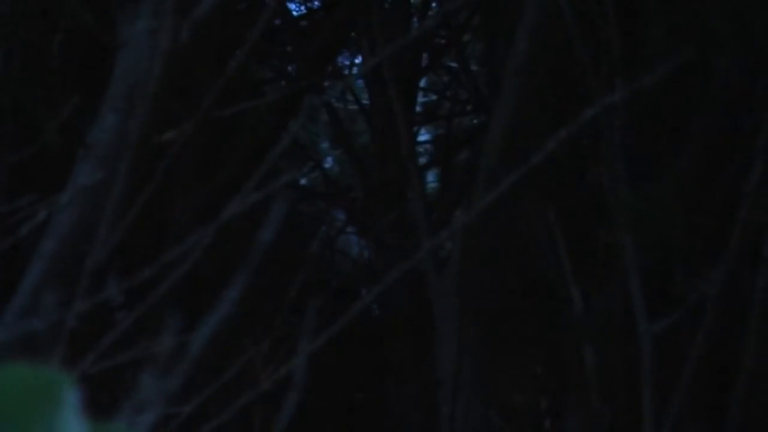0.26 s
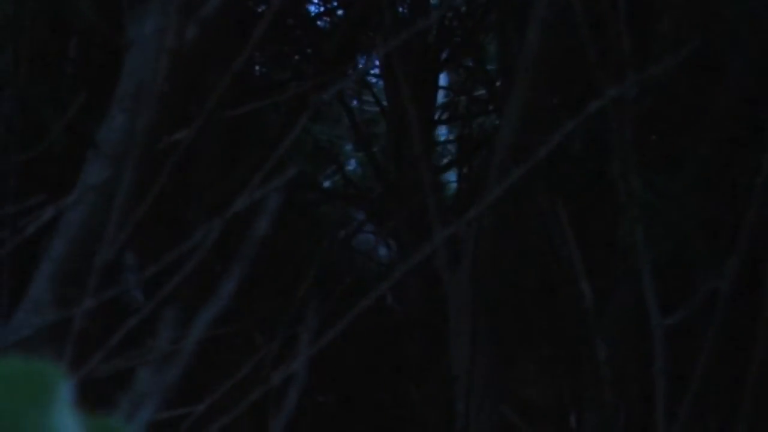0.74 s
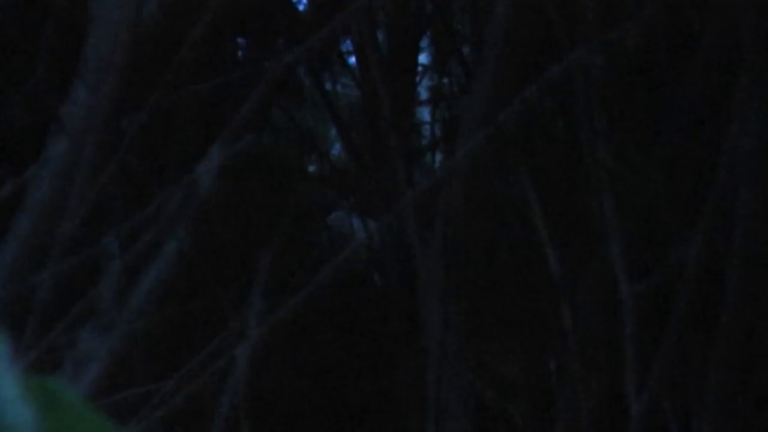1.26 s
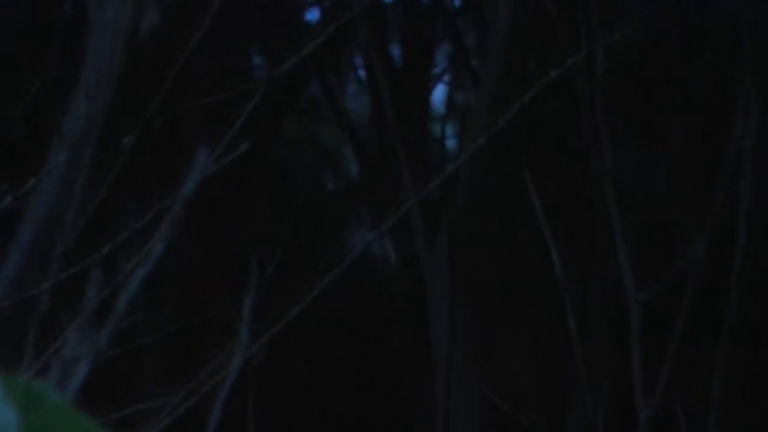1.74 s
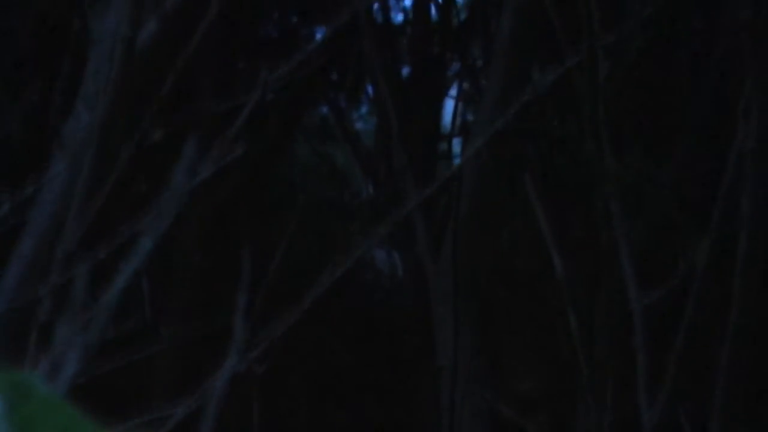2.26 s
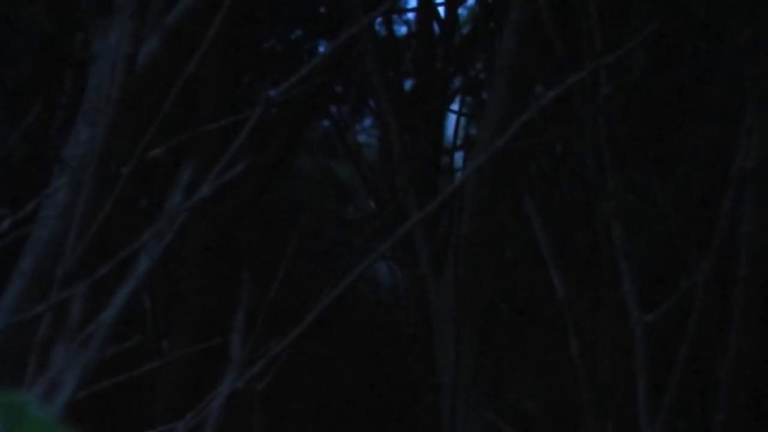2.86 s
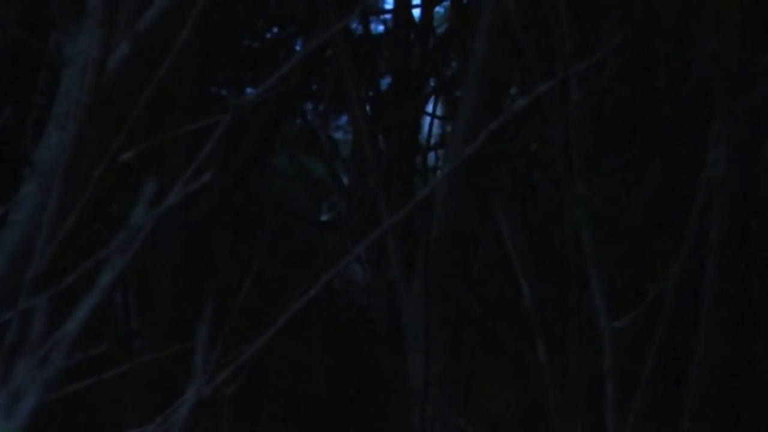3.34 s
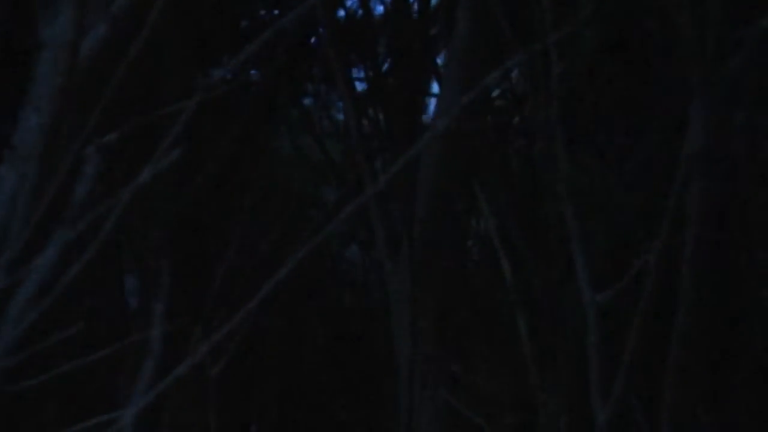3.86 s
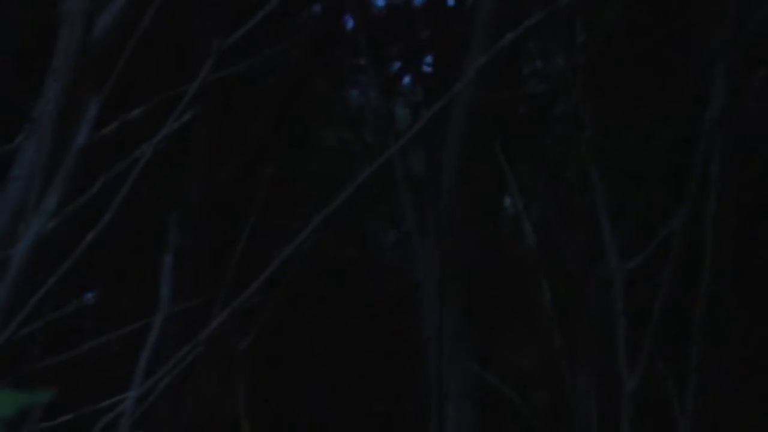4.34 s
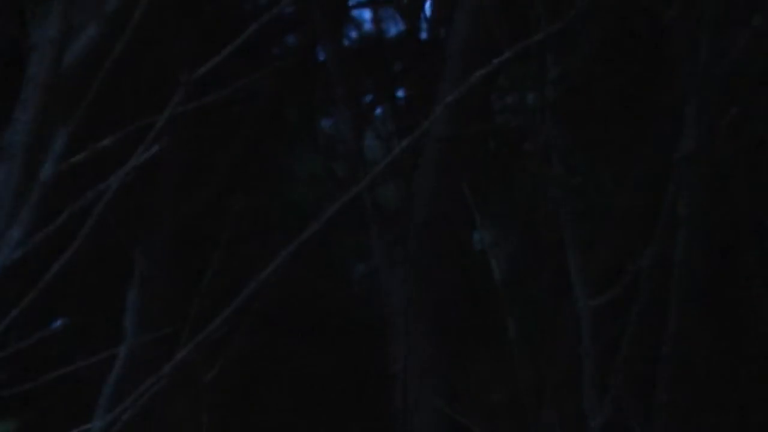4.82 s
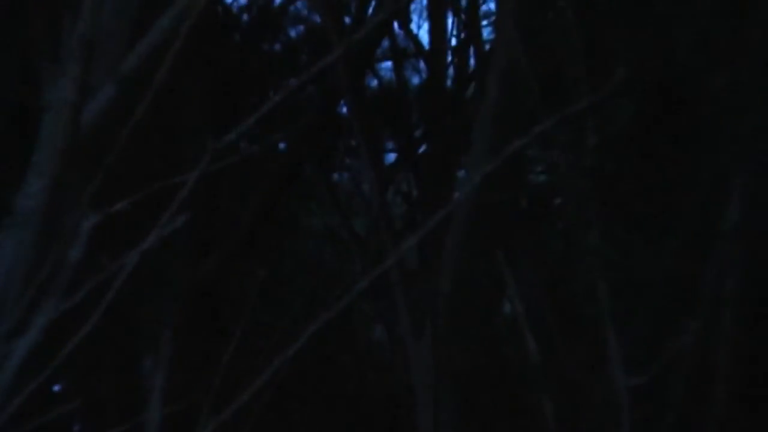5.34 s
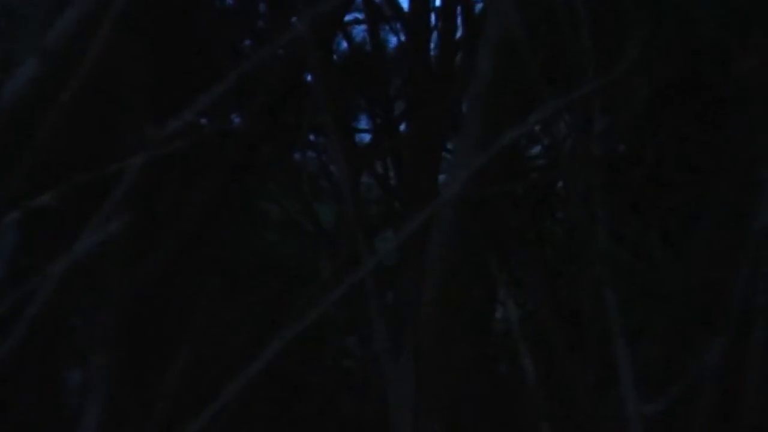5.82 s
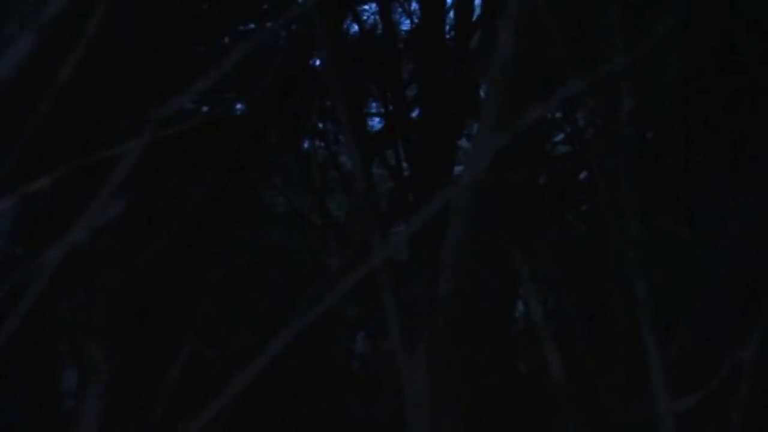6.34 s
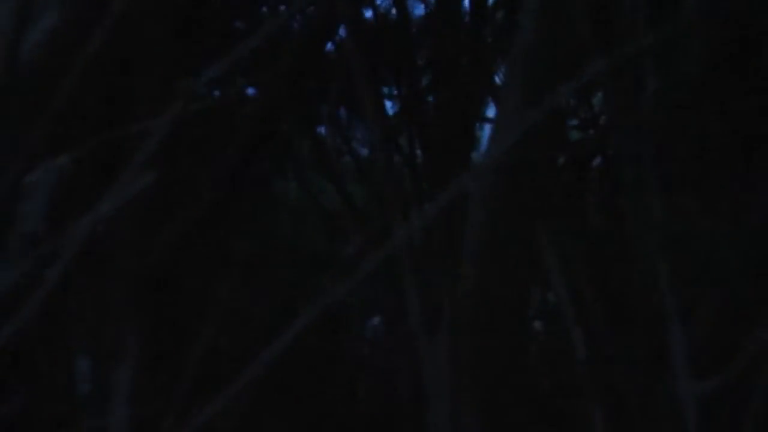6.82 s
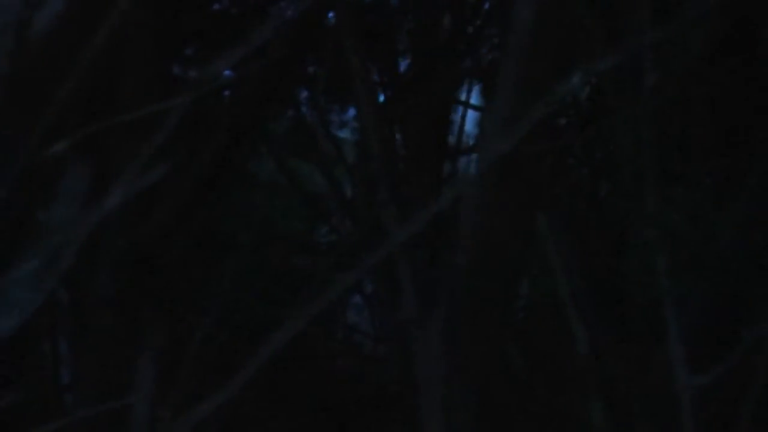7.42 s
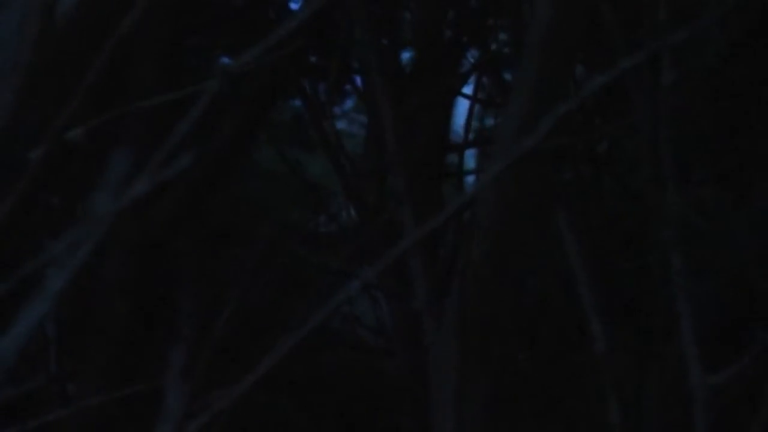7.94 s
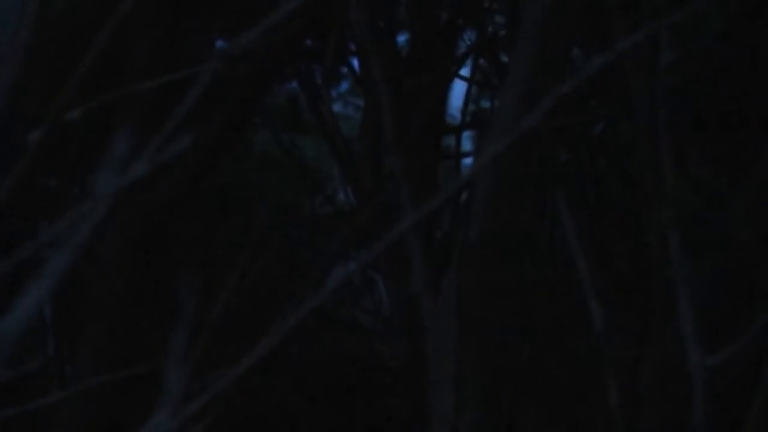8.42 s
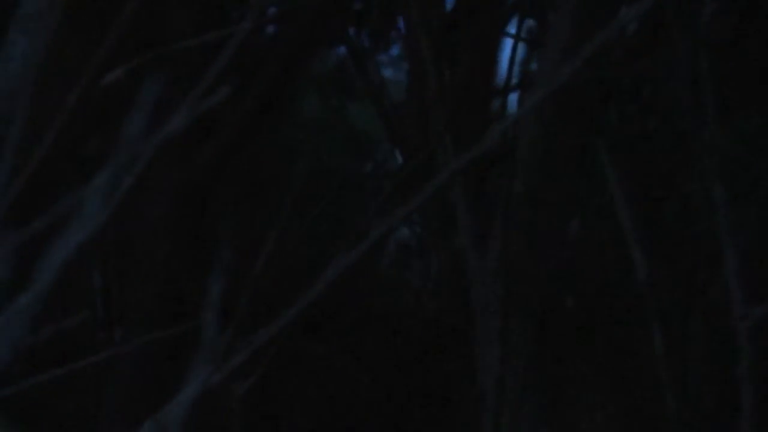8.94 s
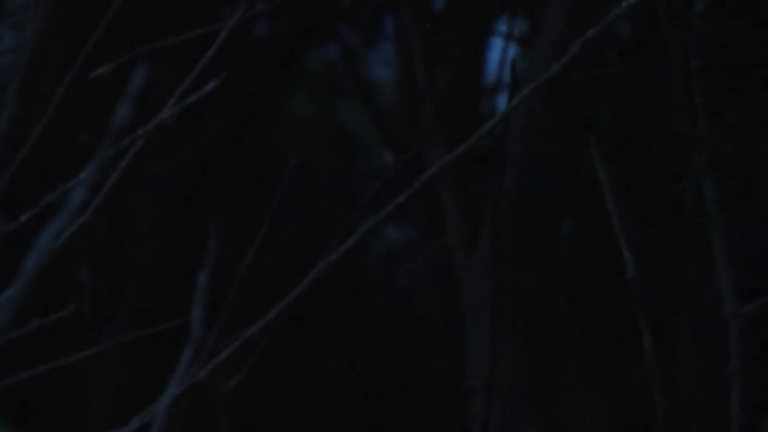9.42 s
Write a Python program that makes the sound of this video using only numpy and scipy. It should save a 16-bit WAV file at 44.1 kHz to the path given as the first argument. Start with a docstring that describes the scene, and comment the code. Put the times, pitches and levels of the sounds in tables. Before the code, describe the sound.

In a quiet wood, far traffic hums under a few faint bird whistles. A hand taps the microphone twice, then a young owl nearby lets out a brief, high squeal with a raspy end. Leaves stir faintly, a twig cracks close by, and the owl screams again, a little louder, leaving a slight echo among the trees. A distant small bird then repeats a thin, scratchy chirp.

```python
"""A young owl screams twice from a tree close to the microphone, in a wood at dusk.
Each scream starts as a clear squeal, then sinks and turns raspy as the syrinx doubles its period.
Nearby a twig snaps, leaves rustle and a hand knocks on the camera that holds the stereo microphone.
Small birds call from deeper in the wood, traffic hums far off, and the trees return a faint tail."""
import sys
import numpy as np
from scipy import signal
from scipy.fft import rfft, irfft
from scipy.io import wavfile
from scipy.ndimage import uniform_filter1d

SR = 44100
rng = np.random.default_rng(int(sys.argv[2]) if len(sys.argv) > 2 else 0)


def int16_out(signal):
    """Quantize to a 16-bit WAV file."""
    q = np.round(np.clip(np.atleast_2d(signal).T, -1, 1) * 32767)
    wavfile.write(sys.argv[1], SR, q.astype(np.int16))


N = 426447
TIME = np.arange(N) / SR


def gain_of(db):
    """Decibels to amplitude."""
    return 10 ** (np.asarray(db) / 20)


def unit_rms(x):
    """Scales to rms 1."""
    return x / np.sqrt(np.mean(x ** 2) + 1e-20)


def curve_at(points, hz):
    """Reads a table on a log-frequency axis."""
    f, value = np.transpose(points)
    return np.interp(np.log(hz + 1), np.log(f + 1), value)


def add(mix, start, sound):
    """Mixes a sound in, start seconds from the beginning."""
    part = mix[round(start * SR):][:len(sound)]
    part += sound[:len(part)]


def filtered(x, gain):
    """Applies a gain given as a function of frequency."""
    return irfft(rfft(x) * gain(np.fft.rfftfreq(len(x), 1 / SR)), len(x))


def wander(size, hz):
    """Random motion of rms 1, mostly slower than hz."""
    return unit_rms(filtered(rng.standard_normal(size), lambda f: 1 / np.sqrt(1 + (f / hz) ** 4)))


def bump(t, centre, width):
    """A smooth rise to 1 and back."""
    return np.exp(-((t - centre) / width) ** 2)


def resonance(f, centre_hz, q):
    """Gain of one broad resonance."""
    return 1 / np.sqrt(1 + (q * (f / centre_hz - centre_hz / (f + 1))) ** 2)


def noise_tone(hz, width_hz):
    """A narrow band of noise, heard as a soft tone."""
    return unit_rms(filtered(rng.standard_normal(N), lambda f: 1 / (1 + (2 * (f - hz) / width_hz) ** 2)))


# Swells on the far road: t/s, half length/s, rise/dB
ROAD_SWELLS = [(.62, 0.12, 4), (2.1, 0.24, 1.5), (3.85, .2, 1.5), (4.76, .11, 2.5), (5.898, .4, 1.75),
               (8.05, 0.25, 1.5), (9.6, .25, 1.5)]

def road_db(start_db=-59, steady_db=-54, build_s=4.6):
    """Level of the far road: it builds up, then stays, swelling now and then."""
    level = start_db + (steady_db - start_db) * np.minimum(TIME / build_s, 1)
    return level + sum(db * bump(TIME, at, half) for at, half, db in ROAD_SWELLS)


# Far traffic and still air: f/Hz, relative level/dB
AMBIENCE_SPECTRUM = [(22, -62), (48, -27), (85, -13), (140, -21.5), (210, -2), (400, 5), (720, 2.5),
                     (1100, 4.5), (1650, 0.5), (2300, -8), (4000, -20), (4600, -23.5), (5300, -23),
                     (7700, -23), (8500, -26.5), (10000, -29.5), (10900, -24.5), (11800, -31), (15500, -34)]
# Their stereo image at the microphone: f/Hz, left-right correlation
AMBIENCE_CORRELATION = [(40, .88), (90, .84), (170, .78), (330, .7), (700, .72), (1300, .8), (4000, .75),
                        (12000, .7)]

def traffic_and_air(rumble_db=-63, hiss_db=-66.5, rumble_hz=230, hiss_hz=2800, patchy_db=2.1):
    """Far traffic swells and drifts between a steady low rumble and an even hiss."""
    frames, hz = N // 256 + 5, np.fft.rfftfreq(1024, 1 / SR)
    left_re, left_im, other_re, other_im, patches = rng.standard_normal((frames, len(hz), 5)).T
    patches = uniform_filter1d(patches, size=5, axis=0)  # smooth across frequency
    patches = unit_rms(uniform_filter1d(patches, size=30, axis=1))  # and across time
    likeness = curve_at(AMBIENCE_CORRELATION, hz)[:, None]
    left = left_re + 1j * left_im
    right = likeness * left + np.sqrt(1 - likeness ** 2) * (other_re + 1j * other_im)
    spectra = np.array([left, right]) * gain_of(curve_at(AMBIENCE_SPECTRUM, hz))[:, None]
    bass, below_hiss = (1 / (1 + (hz[:, None] / edge) ** 4) for edge in (rumble_hz, hiss_hz))
    middle = (below_hiss - bass) * gain_of(patchy_db * patches)
    rumble, road, hiss = (unit_rms(signal.istft(spectra * band, nperseg=1024, noverlap=768)[1][:, :N])
                          for band in (bass, middle, 1 - below_hiss))
    bed = gain_of(rumble_db) * rumble + gain_of(road_db()) * road + gain_of(hiss_db) * hiss
    return bed * gain_of([[-.3], [.3]])  # leans a little to the right


def tyres(hz=1105, width_hz=80, relative_db=-12):
    """Tyres sing on the far road, following the level of the traffic."""
    return gain_of(road_db() + relative_db) * noise_tone(hz, width_hz)


def far_hum(length_s=.47, hz=405, db=-59):
    """A soft, nearly steady tone from far away."""
    size = int(length_s * SR)
    phase = 2 * np.pi * np.cumsum(hz * (1 + .0047 * wander(size, 11.6))) / SR
    return gain_of(db) * unit_rms(np.sin(phase) * signal.windows.tukey(size, .5))


# Thin whines and a hiss band, right at the microphone: f/Hz, width/Hz, level/dB
CAMERA_WHINES = [(2600, 10, -81), (3040, 10, -82), (3580, 10, -79.5), (4560, 320, -77.5),
                 (10600, 60, -83.5)]

def camera_whine():
    """The camera's own faint tones, which never stop."""
    return sum(gain_of(db) * noise_tone(hz, width) for hz, width, db in CAMERA_WHINES)


# Decay of the wood around the microphone: f/Hz, t60/s
WOOD_DECAY = [(500, 0.43), (2300, 1.1), (4500, 0.99), (7000, .8), (9000, 0.62), (14000, .35)]

def tree_echoes(x, branch_db=6, branch_t60=.09, likeness=.89, echoes_per_s=3000):
    """Sparse echoes: a quick cluster from close branches, then a long tail from the trunks."""
    left, other = rng.standard_normal((2, SR)) * (rng.random((2, SR)) < echoes_per_s / SR)
    right = likeness * left + np.sqrt(1 - likeness ** 2) * other
    hz, t, spectra = signal.stft([left, right], SR, nperseg=256)
    trunks = gain_of(-60 * t / curve_at(WOOD_DECAY, hz)[:, None])
    branches = gain_of(branch_db - 60 * t / branch_t60)
    tail = signal.istft(spectra * (trunks + branches), SR, nperseg=256)[1]
    return signal.fftconvolve(x[None], tail / np.linalg.norm(tail[0]), axes=1)[:, :N]


def bird_note(db, length_s, hz, bend, scratch, overtone=0):
    """A thin glide that bends by a share of its pitch and levels off, scratchy if the pitch trembles."""
    size = int(length_s * SR)
    glide_hz = hz * (1 + bend * np.sin(np.linspace(0, np.pi / 2, size)))
    phase = 2 * np.pi * np.cumsum(glide_hz * (1 + scratch * wander(size, 410))) / SR
    tone = np.sin(phase) + overtone * np.sin(2 * phase)
    return gain_of(db) * unit_rms(tone * signal.windows.tukey(size, .7))


# One distant bird repeats a scratchy rising chirp: t/s, relative level/dB
BIRD_CHIRPS = [(0.574, -67.5), (7.826, -60), (7.919, -71), (8.23, -70), (8.6, -68.5), (8.975, -68),
               (9.36, -68)]
# Others give clear, slightly rising whistles: t/s, length/s, f/Hz, relative level/dB
BIRD_WHISTLES = [(0.046, 0.095, 3570, -67), (.816, .13, 7760, -75), (1.05, 0.068, 3800, -72),
                 (2.948, .11, 3060, -70.5), (4.083, 0.169, 2820, -73), (5.13, .076, 4510, -68),
                 (5.409, 0.063, 3700, -70)]
# And very short falling ticks: t/s, relative level/dB
BIRD_TICKS = [(1.473, -62.5), (7.57, -68)]

def small_birds():
    """Chirps, whistles and ticks from deeper in the wood."""
    calls = np.zeros(N)
    for start, db in BIRD_CHIRPS:
        add(calls, start, bird_note(db, length_s=.1, hz=4350, bend=.12, scratch=.038,
                                    overtone=gain_of(-15)))
    for start, length_s, hz, db in BIRD_WHISTLES:
        add(calls, start, bird_note(db, length_s, hz, bend=.035, scratch=.013))
    for start, db in BIRD_TICKS:
        add(calls, start, bird_note(db, length_s=.014, hz=8700, bend=-.14, scratch=.01))
    return calls


# Leaves near the microphone: t/s, length/s, centre f/Hz, level/dB
LEAF_RUSTLES = [(2.048, 0.013, 4500, -63.5), (3.561, 0.057, 3770, -57), (3.616, 0.035, 3300, -54.5),
                (3.838, 0.021, 8500, -63.5)]

def leaves(top_hz=10500):
    """Leaves brush together in clumps of tiny crackles."""
    rustles = np.zeros(N)
    for start, length_s, centre_hz, db in LEAF_RUSTLES:
        size = int(length_s * SR)
        grains = rng.standard_normal(size) * gain_of(4.8 * wander(size, 900))
        grains = filtered(grains, lambda f: resonance(f, centre_hz, q=.98) / (1 + (f / top_hz) ** 6))
        add(rustles, start, gain_of(db) * unit_rms(grains * signal.windows.tukey(size, .8)))
    return rustles


# Handling noise on the camera body: t/s, relative level/dB, centre f/Hz
HAND_KNOCKS = [(1.571, -36, 1200), (1.689, -36, 900)]

def hand_knocks(t60=.035, top_hz=2600):
    """A hand taps the camera: dull knocks with no clear ring."""
    knocks = np.zeros(N)
    t = np.arange(SR // 10) / SR
    for start, db, centre_hz in HAND_KNOCKS:
        body = filtered(rng.standard_normal(len(t)), lambda f: resonance(f, centre_hz, q=.96) ** 2)
        tap = .5 * unit_rms(body) * gain_of(db - 60 * t / t60)
        add(knocks, start, signal.lfilter(*signal.butter(2, top_hz, fs=SR), tap))
    return knocks


# Modes of a dry twig near the microphone: f/Hz, relative level/dB, t60/s
TWIG_MODES = [(340, -17.5, 0.045), (566, -16.5, .04), (1108, -17, 0.022), (1600, -13, 0.017),
              (2620, -10.5, .018), (2950, -9.5, .015), (3750, -7.5, 0.01), (6900, -6, 0.0087),
              (10500, -1, .01)]

def twig_snap(gain_db=-12.5, give_db=-24, crack_db=-7, crack_t60=.01, ground_db=-23, ground_t60=.059):
    """The fibres give for 2 ms, then a sharp crack rings the twig; the ground nearby scatters it."""
    t = np.arange(SR // 8) / SR
    ring = sum(gain_of(db - 60 * t / t60) * np.sin(2 * np.pi * (hz * t + rng.random()))
               for hz, db, t60 in TWIG_MODES)
    crack = gain_of(crack_db - 60 * t / crack_t60) * rng.standard_normal(len(t))
    scatter = unit_rms(filtered(rng.standard_normal(len(t)), lambda f: 1 / np.sqrt(1 + f / 1500)))
    scatter *= gain_of(ground_db - 60 * t / ground_t60)
    give = gain_of(give_db) * rng.standard_normal(88)
    snap = np.concatenate([give, .74 * ring + crack + scatter])
    return gain_of(gain_db) * signal.lfilter(*signal.butter(2, [220, 13000], "bandpass", fs=SR), snap)


def ground_bounce(x, delay_s=.008, echo_db=-15):
    """One echo off the ground on the way to the microphone makes gliding harmonics swell and fade."""
    return x + gain_of(echo_db) * np.interp(TIME - delay_s, TIME, x, left=0)


def partials(phase, orders, shimmer_db, shimmer_hz):
    """Partials at the given multiples of a cycle, each wavering in strength."""
    return sum(np.cos(k * phase + rng.uniform(0, 2 * np.pi))
               * gain_of(shimmer_db * wander(len(phase), shimmer_hz)) for k in orders)


def syrinx(hz, doubling, quartering, hoarseness, jitter=.0017, slip=.045, tilt_db_per_octave=2):
    """The syrinx buzzes at one pitch; unequal cycles add lines at halves and quarters of it."""
    size = len(hz)
    flutter = hoarseness * gain_of(2 * wander(size, 110))  # hoarseness comes in short bursts
    cycles = np.cumsum(hz * (1 + jitter * wander(size, 120))) / SR
    phase = 2 * np.pi * (cycles + slip * flutter * wander(size, 700))  # hoarse cycles come early or late
    buzz = partials(phase, range(1, 8), shimmer_db=1.7, shimmer_hz=26)
    buzz *= 1 + .6 * flutter * wander(size, 1000)
    # the longer cycles hold less firmly, so their lines waver more
    halves = partials(phase / 2, range(1, 15, 2), shimmer_db=2.2, shimmer_hz=35)
    quarters = partials(phase / 4, range(3, 28, 2), shimmer_db=3, shimmer_hz=35)
    rasp = gain_of(2) * doubling * halves + gain_of(-5) * quartering * quarters
    hiss = 4 * gain_of(-10) * flutter * rng.standard_normal(size)
    return buzz + filtered(rasp + hiss, lambda f: gain_of(tilt_db_per_octave * np.log2((f + 500) / 6000)))


# Response of the owl's throat and open beak: f/Hz, gain/dB
THROAT_RESPONSE = [(600, -26.5), (1150, -16), (1600, -28), (2350, -14), (3000, -32), (3500, -12),
                   (3950, -14.5), (4600, -3), (5300, -7), (7000, -11.5), (7900, -18), (9000, -0.5),
                   (9800, -1), (10400, -6.5), (12200, -15), (14200, -29.5), (15600, -39)]

def throat(buzz, t, treble_hz=6000, treble_db=-1, dulling_db_per_s=8):
    """Throat and beak colour the buzz; the treble dulls as the scream goes on, the rms is held at 1."""
    voice = filtered(buzz, lambda f: gain_of(curve_at(THROAT_RESPONSE, f)))
    treble = filtered(voice, lambda f: 1 - 1 / (1 + (f / treble_hz) ** 12))
    voice += (gain_of(treble_db - dulling_db_per_s * t) - 1) * treble
    return voice / np.sqrt(uniform_filter1d(voice ** 2, size=500) + 1e-12)


# The tune of each scream, a scoop up, a hold and a long sag: t/s from its start, f/Hz
SCREAM_TUNE = [(0, 2314), (.017, 2443), (.044, 2484), (.08, 2415), (.12, 2406), (.175, 2442), (.29, 2332),
               (.38, 2232), (.45, 2211)]
# The scream dips briefly in level as its pitch crosses one of the camera's notches:
# t/s in the scene, half length/s, depth/dB
LEVEL_DIPS = [(2.539, .007, 5), (2.566, .008, 4), (6.617, .01, 6.5)]

def scream(start, length_s, level_db, swell_db_per_s, raspy_s, rasp_db, quarters_end_s,
           attack_s=.004, rasp_rise_s=.024, tired_db=3.7, collapse_db=16.5, collapse_hz=125):
    """One scream: a clear squeal tips into rasp as the period doubles, then tires and collapses."""
    t = np.arange(0, length_s, 1 / SR)
    strain = bump(t, .038, .024)  # at the top of the scoop
    unsteady = bump(t, raspy_s, .055)  # while tipping into the rasp
    tired = np.maximum(1 - (length_s - t) / .19, 0)  # the air runs low
    collapse = np.maximum(1 - (length_s - t) / .04, 0)
    tremor = unsteady * wander(len(t), hz=70)
    dip_db = sum(db * bump(start + t, at, half) for at, half, db in LEVEL_DIPS)
    hz = np.interp(t, *np.transpose(SCREAM_TUNE)) * (1 + .005 * tremor)
    hz -= collapse_hz * np.sin(np.pi / 2 * collapse) ** 2
    doubling = gain_of(rasp_db) / (1 + np.exp((raspy_s - t) / rasp_rise_s)) + gain_of(-27.5) * strain
    quartering = doubling / (1 + np.exp((t - quarters_end_s) / rasp_rise_s))
    hoarse_db = -28 + 9 * strain + 6 * unsteady + dip_db + 14 * np.minimum(2 * collapse, 1)
    voice = throat(syrinx(hz, doubling, quartering, gain_of(hoarse_db)), t)
    loss_db = dip_db + tired_db * tired + collapse_db * collapse ** 2
    level = gain_of(level_db + swell_db_per_s * t + tremor - loss_db)
    attack = np.minimum(t / attack_s, 1) ** 2
    return level * attack * voice * signal.windows.tukey(len(t), .008)


# Screams from the close tree: t/s, length/s, level/dB, swell/(dB/s), raspy after/s,
# relative rasp level/dB, quarter lines fade after/s
OWL_SCREAMS = [(2.348, .487, -18.7, 7, .18, -16.5, 0.36), (6.381, .485, -12.4, -1.5, .21, -18, .46)]

def owl():
    """The young owl screams twice from its tree, close to the microphone."""
    screams = np.zeros(N)
    for start, *shape in OWL_SCREAMS:
        add(screams, start, scream(start, *shape))
    return screams


def microphone_ports(x):
    """The two microphone ports differ a little in colour and in phase, left and right oppositely."""
    lean = [(2300, .55), (4600, -.35), (9500, .7), (12500, .2)]  # f/Hz, left gain/dB
    lead = [(2300, .05), (4600, .09), (9500, .06), (12500, .26)]  # f/Hz, left phase/rad
    return np.array([
        filtered(x, lambda f: gain_of(side * curve_at(lean, f)) * np.exp(1j * side * curve_at(lead, f)))
        for side in (1, -1)])


def scene(near_wet_db=-21, far_wet_db=-6, far_dry_db=-2):
    """From the microphone the owl, twig and leaves are near and dry, the small birds far and wet."""
    screams = owl()
    near = np.zeros(N)
    add(near, start=6.0242, sound=twig_snap())
    near += hand_knocks() + leaves()
    far = small_birds()
    add(far, start=8.83, sound=far_hum())
    direct = microphone_ports(ground_bounce(screams) + near) + gain_of(far_dry_db) * far
    echoes = tree_echoes(gain_of(near_wet_db) * (screams + .5 * near) + gain_of(far_wet_db) * far)
    return direct + echoes + traffic_and_air() + tyres() + camera_whine()


def record(dry, spacing_hz=300, width_hz=28, depth=.86, top_hz=15680):
    """The camera cuts a comb of narrow notches (only even ones in the treble), then limits the band."""
    notches = [spacing_hz * k for k in range(1, 53) if k < 14 or k % 2 == 0]
    hz = np.fft.rfftfreq(8192, 1 / SR)
    comb = np.prod([1 - depth / (1 + 2j * (hz - f) / width_hz) for f in notches], axis=0)
    combed = signal.oaconvolve(dry, irfft(comb)[None, :4096], axes=1)[:, :N]
    lowpass = signal.firwin(511, top_hz, window=("kaiser", 9), fs=SR)
    return signal.oaconvolve(combed, lowpass[None], "same")


dry = scene()
out = record(dry)
int16_out(out)
```